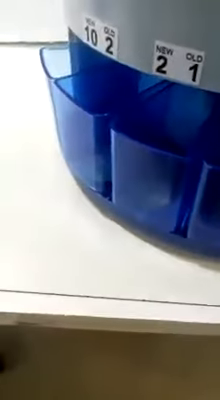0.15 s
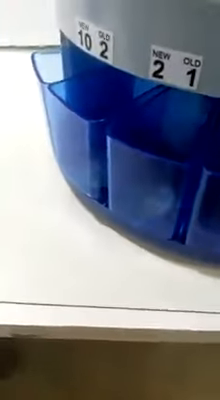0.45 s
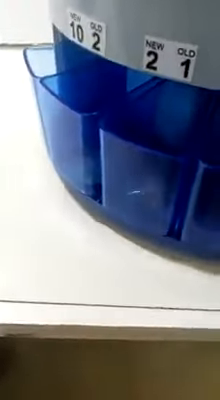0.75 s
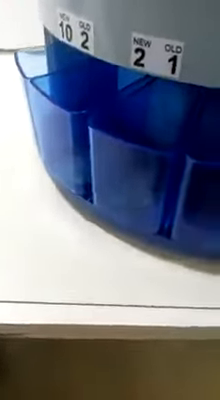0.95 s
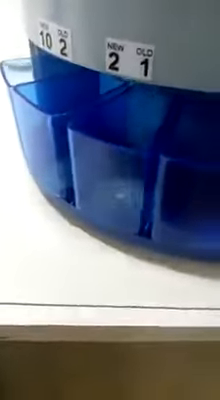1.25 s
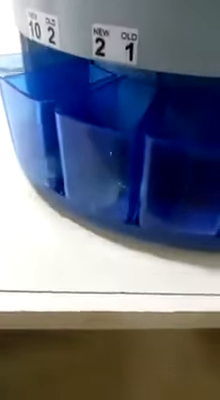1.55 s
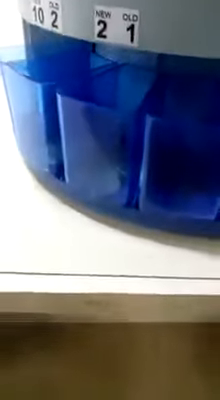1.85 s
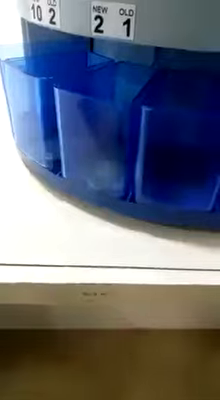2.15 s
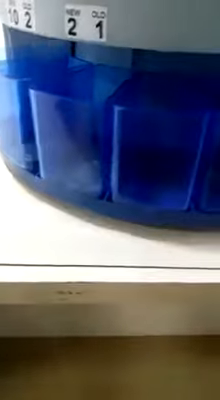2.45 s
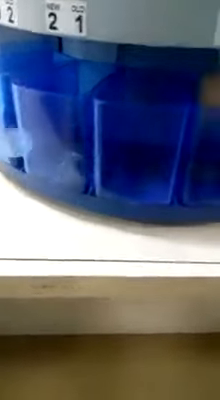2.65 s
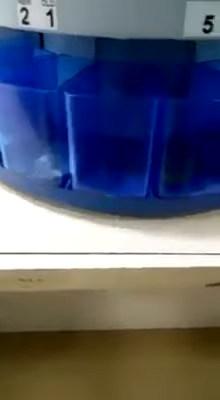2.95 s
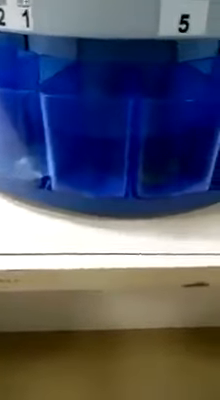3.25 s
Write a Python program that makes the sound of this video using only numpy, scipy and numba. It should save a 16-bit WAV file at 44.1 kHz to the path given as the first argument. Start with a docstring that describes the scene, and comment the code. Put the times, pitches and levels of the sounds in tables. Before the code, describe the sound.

Coins rattle and clatter through a plastic sorting machine over a faint motor hum.

```python
"""Coin sorter on a table.

Coins tumble through a plastic sorting machine, close to a phone held left of it. Loud knocks and a
dense rattle ring the case and the coins; a few coins sing on. Landing coins thud in the hollow
drawers, hard knocks shake the table, and the motor hums below."""
import sys
import numpy as np
from scipy import signal
from scipy.fft import rfft, irfft
from scipy.io import wavfile
from scipy.ndimage import uniform_filter1d
from numba import njit

SR = 44100
rng = np.random.default_rng(int(sys.argv[2]) if len(sys.argv) > 2 else 0)


def generate_wav(signal):
    """Clip the signal to [-1, 1] and save it as 16-bit WAV at the path in sys.argv[1]."""
    frames = np.transpose(np.atleast_2d(signal))
    scaled = np.clip(frames, -1, 1) * 32767
    pcm = np.round(scaled).astype(np.int16)
    wavfile.write(sys.argv[1], SR, pcm)


N = 149940
STEP = 64  # samples per control step
TIME_S = np.arange(N) / SR
STEP_S = np.arange(N // STEP + 1) * STEP / SR


def undb(db):
    return 10 ** (np.asarray(db) / 20)


def band(x, lo_hz, hi_hz):
    return signal.sosfilt(signal.butter(3, [lo_hz, hi_hz], "band", fs=SR, output="sos"), x)


def decay(x, tau_s):
    return signal.lfilter([1], [1, -np.exp(-1 / (tau_s * SR))], x)


def curve(rows, column=1):
    """Gain per sample from dB breakpoints."""
    rows = np.array(rows)
    return undb(np.interp(TIME_S, rows[:, 0], rows[:, column]))


def walk(rate_hz):
    """Slewed random levels, one per control step; spread near 1."""
    hold = int(SR / STEP / rate_hz) + 2
    levels = np.repeat(rng.standard_normal(N // STEP // hold + 2), hold)
    return uniform_filter1d(levels, hold // 2)[:len(STEP_S)]


def noise(correlation=.3):
    """Two-channel noise, partly shared."""
    shared, own = rng.standard_normal((2, N))
    return np.array([correlation * shared + np.sqrt(1 - correlation ** 2) * own, shared])


@njit
def resonance(x, gain, hz, width_hz):
    """State-variable band-pass; gain and pitch move each control step."""
    g, damping = np.tan(np.pi * hz / SR), width_hz / hz
    y = np.empty(x.shape)
    for c in range(x.shape[0]):
        mid, low = 0., 0.
        for i in range(x.shape[1]):
            j = i // STEP
            v = (mid + g[j] * (gain[j] * x[c, i] - low)) / (1 + g[j] * (g[j] + damping[j]))
            mid, low = 2 * v - mid, low + 2 * g[j] * v
            y[c, i] = damping[j] * v
    return y


def ring(x, modes, flicker_db, rate_hz, drift, boost_db=lambda hz: 0):
    """A body's modes at constant total power; as things shift, their levels and pitches wander."""
    gains = np.array([undb(db + boost_db(hz) + flicker_db * walk(rate_hz)) for hz, _, db in modes])
    gains /= np.sqrt(sum(g ** 2 * width * np.pi / SR for g, (_, width, _) in zip(gains, modes)))
    return sum(resonance(x, g, hz * (1 + drift * walk(rate_hz)), width)
               for g, (hz, width, _) in zip(gains, modes))


def contact(times, db, decay_s, attack_s=.0008):
    """Envelope of sudden contacts: fast decay, faint longer tail."""
    hits = np.bincount((times * SR).astype(int), undb(db), N)
    envelope = decay(hits, decay_s) + undb(-22.5) * decay(hits, tau_s=.02)
    return decay(envelope, attack_s) / (attack_s * SR)


def rattle(scatter_db, clicks_per_s=700):
    """Unit-RMS envelope of many small, uneven contacts."""
    when, chance = rng.random((int(clicks_per_s * N / SR), 2)).T
    hits = np.bincount((when * N).astype(int), undb(-scatter_db * np.log(chance + .033)), N)
    envelope = decay(hits, tau_s=.0067)
    return envelope / np.sqrt(np.mean(envelope ** 2))


# Motor modes: f/Hz, width/Hz, relative level/dB
MOTOR_MODES = [(105.2, 7.3, 0.5), (163, 78, -1), (207, 27, -2), (279, 41, 1.5), (420, 53, -4.5)]
# Bass level, with brief dips: t/s, level/dB
BASS_LEVEL = [(0.0, -54), (0.33, -51), (0.39, -77), (0.47, -46.5), (0.54, -71), (0.69, -53), (0.81, -85),
              (0.97, -46), (1.17, -75), (1.23, -53), (1.32, -82), (1.42, -56), (1.6, -78), (1.71, -52.5),
              (2.46, -55), (2.51, -76), (2.59, -55), (2.69, -85), (2.8, -57), (3.4, -54.5)]


def bass():
    """A faint low rumble that cuts out briefly around loud knocks."""
    rumble = ring(noise(.96), MOTOR_MODES, flicker_db=6.5, rate_hz=12, drift=.088)
    return curve(BASS_LEVEL) * band(rumble, 53, 790)


def motor_hum(hz=301.5, start_s=3.17, swell_s=.08):
    """A hum comes out near the end, as the clatter thins."""
    age_s = np.maximum(TIME_S - start_s, 0)
    gain = undb(-49 + 2.6 * np.repeat(walk(20), STEP)[:N]) * (1 - np.exp(-age_s / swell_s))
    return band(gain * np.sin(2 * np.pi * hz * age_s), 150, 600)


# Hollow drawer modes: f/Hz, width/Hz, relative level/dB
DRAWER_MODES = [(582, 260, 12), (678, 110, 11.5), (865, 140, 4.5), (1047, 200, 11), (1210, 53, -1.5)]
# Tumbling in the drawers: t/s, level/dB
DRAWER_TUMBLE = [(0.0, -33.5), (0.29, -49.5), (0.36, -41.5), (1.39, -45), (1.56, -35.5), (1.63, -47.5),
                 (2.05, -40), (2.42, -54), (2.5, -39), (3.27, -50), (3.4, -43.5)]
# Coins landing: t/s, relative level/dB
LANDINGS = [(0.33, -21.5), (0.404, -28), (0.501, -43), (0.649, -27.5), (0.697, -20.5), (0.946, -24),
            (1.523, -32), (1.707, -30), (2.026, -31), (2.059, -25), (2.48, -28), (2.505, -25),
            (2.881, -26.5)]


def drawers(knock_s, knock_db):
    """Knocks, landings and tumbling coins ring the hollow drawers."""
    land_s, land_db = np.array(LANDINGS).T
    drive = contact(knock_s, knock_db - 42, decay_s=.0025) + contact(land_s, land_db - 10, decay_s=.023)
    drive += curve(DRAWER_TUMBLE) * rattle(scatter_db=.87)
    return band(ring(drive * noise(), DRAWER_MODES, flicker_db=6.4, rate_hz=15, drift=.075), 572, 1550)


LOW_HZ, MID_HZ, HIGH_HZ, THIN_HZ = 11063, 12188, 14813, 14966
# Coins that sing on, at the pitches above: t/s, f/Hz, level/dB, swell/s, T60/s
SINGING_COINS = [(1.778, MID_HZ, -23, 0.0089, 0.26), (1.80, HIGH_HZ, -44, .02, 0.26),
                 (1.96, HIGH_HZ, -51, 0.022, 0.27), (2.233, LOW_HZ, -15, 0.033, 0.18),
                 (2.64, THIN_HZ, -28, .01, 0.28), (2.80, HIGH_HZ, -48, 0.009, 1.3),
                 (2.955, HIGH_HZ, -37, .01, .5), (3.238, HIGH_HZ, -34, .006, 0.26)]


def singing():
    """Single coin modes swell, waver and fade."""
    out = np.zeros(N)
    for start_s, hz, db, swell_s, t60_s in SINGING_COINS:
        age_s = np.maximum(TIME_S - start_s, 0)
        waver_db = 3.4 * uniform_filter1d(np.repeat(walk(70), STEP)[:N], size=STEP)
        envelope = undb(db - 60 * age_s / t60_s + waver_db) * (1 - np.exp(-age_s / swell_s))
        out += envelope * np.sin(2 * np.pi * hz * age_s)
    return out


# Coin modes: f/Hz, width/Hz, relative level/dB
COIN_MODES = [(9200, 2700, -17), (10550, 790, 2.5), (11050, 640, 8.5), (11360, 230, 7.5), (12140, 500, 4),
              (13240, 1300, 5.5), (14100, 740, -1.5), (14380, 380, 5), (15500, 390, 3.5)]


def jingle(drive):
    """Contacts ring the coins' high metal modes."""
    return band(ring(drive * noise(), COIN_MODES, flicker_db=3, rate_hz=24, drift=.004), 3800, 19000)


# Case modes: f/Hz, width/Hz, relative level/dB
CASE_MODES = [(2016, 62, 15), (2540, 52, 1), (2507, 83, 7.5), (2874, 218, 16), (3126, 68, 13.5),
              (3380, 68, 14.5), (3746, 138, 14.5), (4127, 205, 11), (4834, 220, 5.5), (5220, 110, 6.5),
              (5790, 260, 4.5), (6620, 220, 5), (7330, 220, -12), (2143, 99, 9)]
# Where the case rings most: t/s, f/Hz
CASE_FOCUS = [(0.3, 2830), (0.37, 4150), (0.48, 4000), (0.55, 2780), (0.85, 3600), (1.05, 2850),
              (1.3, 3400), (1.9, 3900), (2.15, 2600), (2.5, 3870), (2.78, 2700), (3.0, 3800), (3.2, 2700)]


def case(drive, focus_db=3.5, focus_octaves=.18):
    """The plastic case rings; the favoured modes shift as the coins move round it."""
    centre_hz = np.interp(STEP_S, *np.array(CASE_FOCUS).T)

    def boost_db(hz):
        return focus_db * np.exp(-(np.log2(hz / centre_hz) / focus_octaves) ** 2)

    return ring(drive * noise(), CASE_MODES, flicker_db=3.5, rate_hz=10, drift=.012, boost_db=boost_db)


def clack(drive, knock_s, clack_hz):
    """One broad resonance, retuned at each knock."""
    latest = (np.searchsorted(knock_s, STEP_S + STEP / SR) - 1).clip(0)
    return resonance(drive * noise(), np.full(len(STEP_S), undb(16)), clack_hz[latest], width_hz=330.)


# Rattle envelope: t/s, case level/dB, coin level/dB
RATTLE_LEVELS = [(0.0, -27.5, -30.5), (0.26, -35, -82), (0.35, -30.5, -47), (1.83, -31, -30),
                 (1.89, -36.5, -109), (2.06, -30, -41.5), (2.13, -54, -106), (2.15, -36.5, -45),
                 (2.26, -35, -25), (2.41, -51, -73), (2.49, -37, -68), (2.61, -32.5, -69),
                 (2.63, -31.5, -30), (2.91, -30, -38.5), (3.05, -28.5, -29), (3.12, -33.5, -50),
                 (3.4, -41, -73)]
# Coin knocks: t/s, relative level/dB, jingle offset/dB, clack f/Hz
COIN_KNOCKS = [(0.2917, -23, -30, 2060), (0.3503, -8, -27, 4160), (0.384, -13, -20, 4400),
               (0.405, -8.5, -30, 4130), (0.5015, 4.5, -10, 2900), (0.5734, -27, 6, 2900),
               (0.5915, -4.5, -15, 4200), (0.6447, -10.5, -24, 2930), (0.698, -9, -29, 3100),
               (0.7584, -1.5, -4.5, 3420), (0.8115, -12, -7, 3480), (0.8724, -11, -10, 4600),
               (0.8836, -6.5, -19, 3550), (0.9973, -7, -31, 3640), (1.0552, -1.5, -14.5, 2640),
               (1.1008, -9.5, -12, 2980), (1.1393, -19, -10, 2800), (1.1493, -16, -22, 4100),
               (1.1683, -3, -20, 2920), (1.193, -4.5, -6, 3000), (1.276, -8.5, -9, 4000),
               (1.295, -11.5, -21, 4010), (1.3127, -1, -10, 3140), (1.4147, -3, -25, 2830),
               (1.476, -8, -17, 2700), (1.502, -9, -3, 2900), (1.5274, -7, -4, 3080),
               (1.5603, -2.5, -33, 3020), (1.586, -6, -5.5, 3100), (1.631, -11.5, -22, 3400),
               (1.7757, -9, -10, 3060), (1.9645, -14.5, -11, 3770), (1.9809, -9, -45, 3740),
               (2.0627, -16, -43, 3070), (2.1467, -0.5, -12, 3000), (2.166, -9, -11, 2840),
               (2.2074, -12, -15, 3480), (2.222, -13.5, -11, 3450), (2.4298, -22, -27, 3000),
               (2.4732, -8.5, -29, 3700), (2.482, -6.5, -34, 3800), (2.5032, -4.5, -48, 3180),
               (2.5681, -10.5, -47, 3200), (2.601, -15, -22, 3810), (2.618, -15, -5, 3770),
               (2.6294, -8, -3.5, 4040), (2.689, -5, -14, 3420), (2.7, -5, -20, 2900),
               (2.75, -7.5, -12, 3960), (2.7906, 0.5, -31, 2790), (2.8037, -5, -31, 2620),
               (2.922, -15, -17, 4000), (2.957, -19, 4, 3020), (3.0828, -5, -10, 3400),
               (3.1791, -6, -23, 2880), (3.21, -11.5, -30, 2800), (3.239, -16, -6, 2700)]


def tumbling_coins():
    """Knocks and rattle drive case, coins and drawers; knocks crack, and hard ones shake the table."""
    knock_s, knock_db, jingle_db, clack_hz = np.array(COIN_KNOCKS).T
    knocks = contact(knock_s, knock_db - 16, decay_s=.003)
    case_drive = knocks + curve(RATTLE_LEVELS) * rattle(scatter_db=2.8)
    coin_drive = contact(knock_s, knock_db + jingle_db - 9.5, decay_s=.0056)
    coin_drive += curve(RATTLE_LEVELS, column=2) * rattle(scatter_db=.7)
    plastic = band(case(case_drive) + clack(knocks, knock_s, clack_hz), 1810, 22000)
    crack = band(contact(knock_s, knock_db - 23, decay_s=.0015) * noise(), 2400, 9400)
    table_bump = band(contact(knock_s, 3 * knock_db - 31.5, decay_s=.0035) * noise(.9), 60, 1500)
    return plastic + crack + table_bump + jingle(coin_drive) + drawers(knock_s, knock_db)


def room(x, level_db=-12, t60_s=.35):
    """Short diffuse reflections, starting after 4 ms."""
    age_s = np.arange(int(.4 * SR)) / SR
    tail = rng.standard_normal((2, len(age_s))) * undb(-60 * age_s / t60_s) * (age_s > .004)
    tail *= undb(level_db) / np.sqrt(np.sum(tail ** 2, axis=1, keepdims=True))
    return signal.fftconvolve(x, tail, axes=1)[:, :N]


def scene():
    """Coins and their reflections over hum and rumble."""
    coins = tumbling_coins() + singing()
    return motor_hum() + bass() + coins + room(coins)


# Stereo balance: f/Hz, left minus right/dB
BALANCE = [(60, -4), (110, 2), (200, 0), (380, -4.5), (700, -4), (1290, -2), (2380, -9), (4400, -11),
           (8120, -7.5), (15000, -7)]


def record(dry, mic_top_hz=15420, cutoff_hz=16300):
    """The right port faces the machine; the phone clips and cuts the top."""
    hz = np.fft.rfftfreq(N, 1 / SR)
    point_hz, point_db = np.array(BALANCE).T
    balance_db = np.interp(np.log(hz + 1), np.log(point_hz), point_db)
    response = undb([balance_db / 2, -balance_db / 2]) / np.sqrt(1 + (hz / mic_top_hz) ** 400)
    clipped = irfft(rfft(dry) * response, N).clip(-1, 1)
    return signal.sosfilt(signal.ellip(10, .2, 70, cutoff_hz, fs=SR, output="sos"), clipped)


dry = scene()
out = record(dry)
generate_wav(out)
```